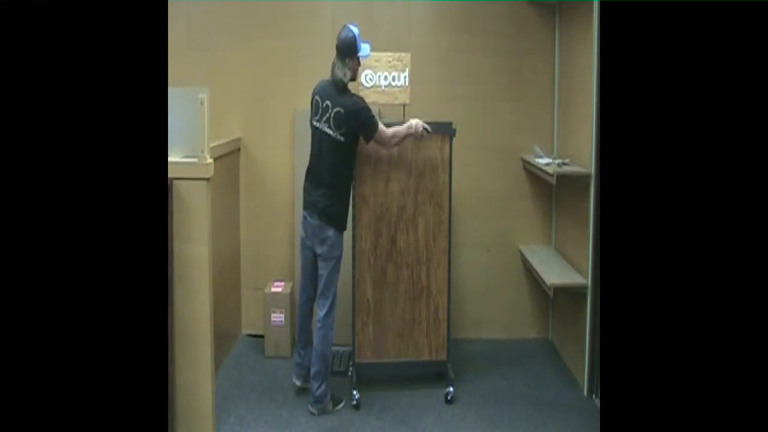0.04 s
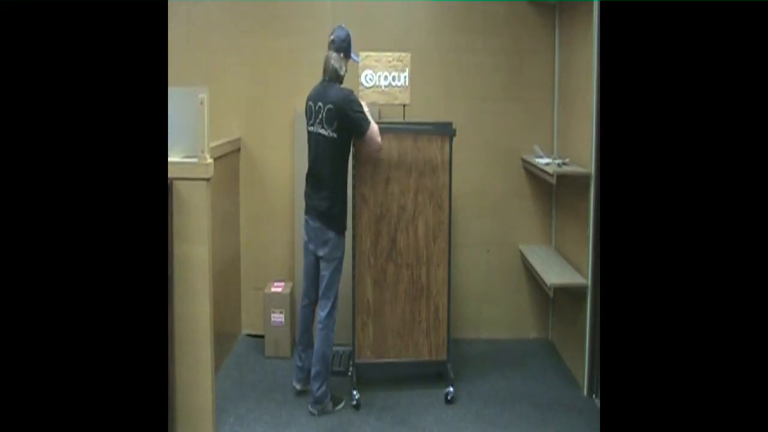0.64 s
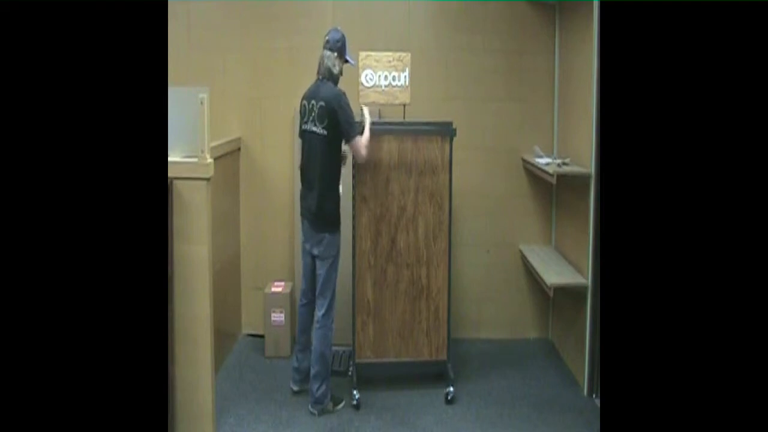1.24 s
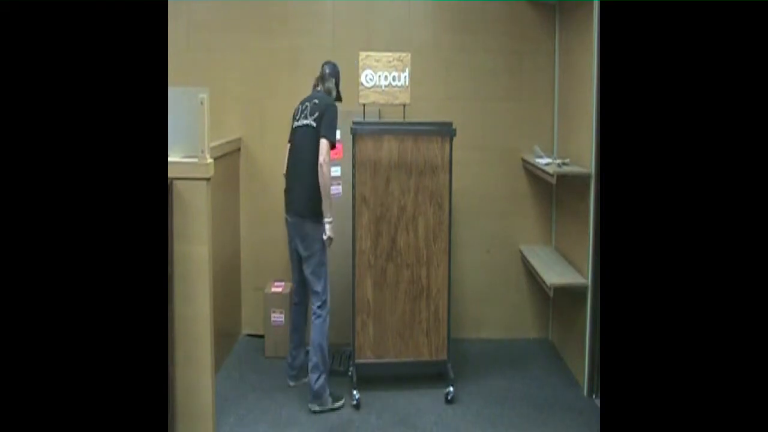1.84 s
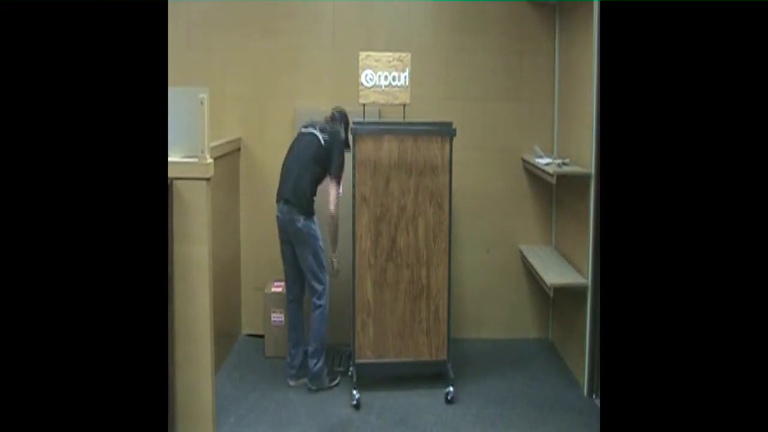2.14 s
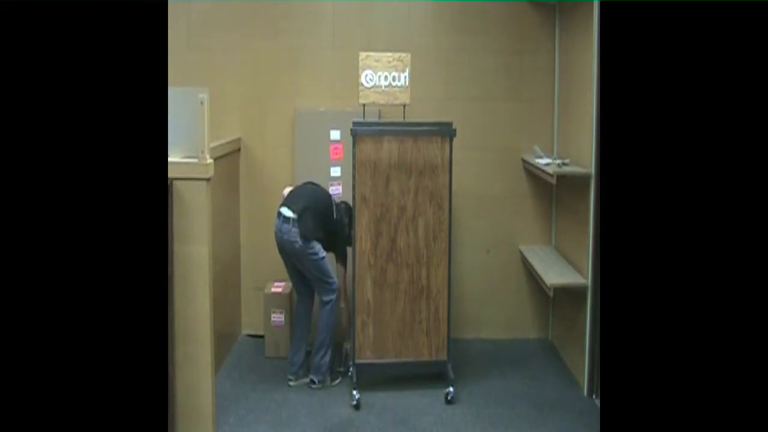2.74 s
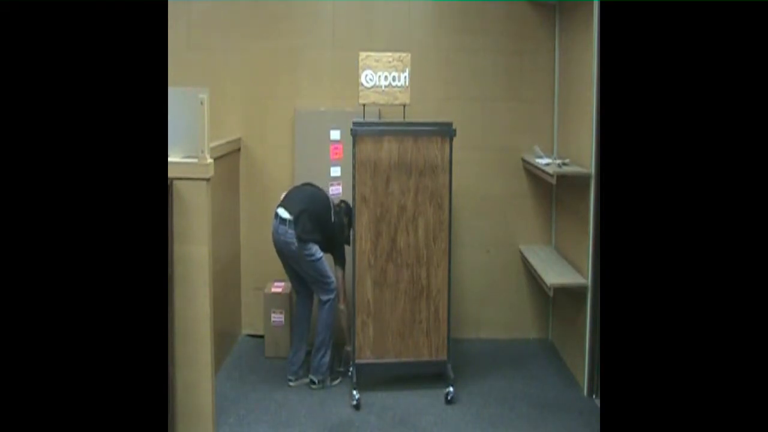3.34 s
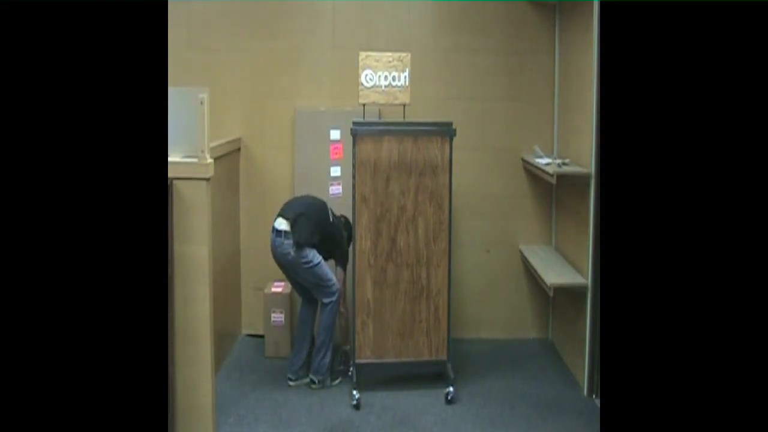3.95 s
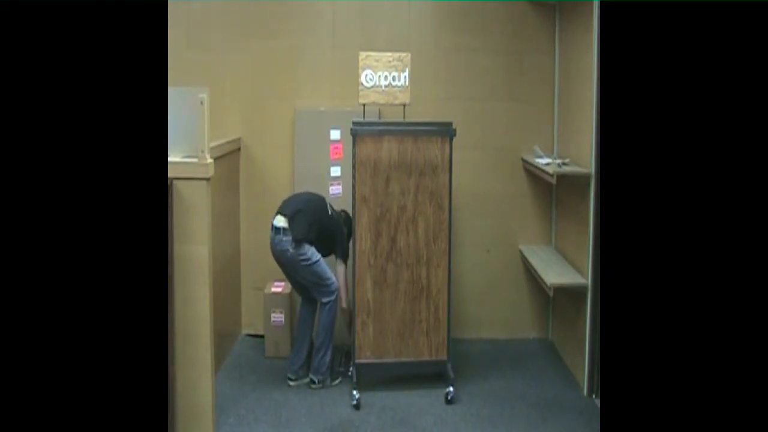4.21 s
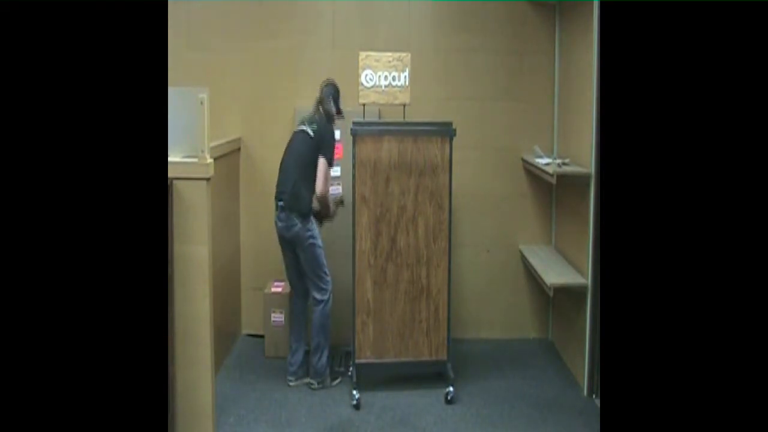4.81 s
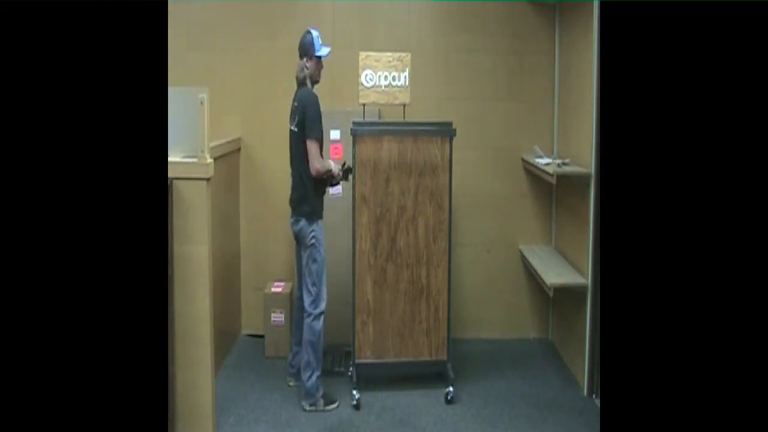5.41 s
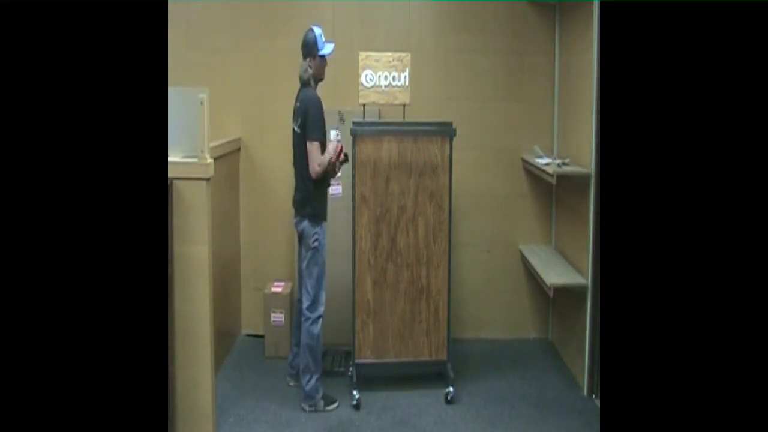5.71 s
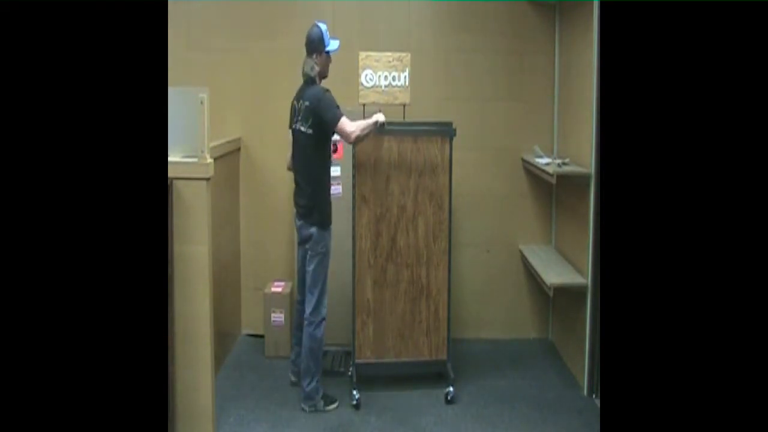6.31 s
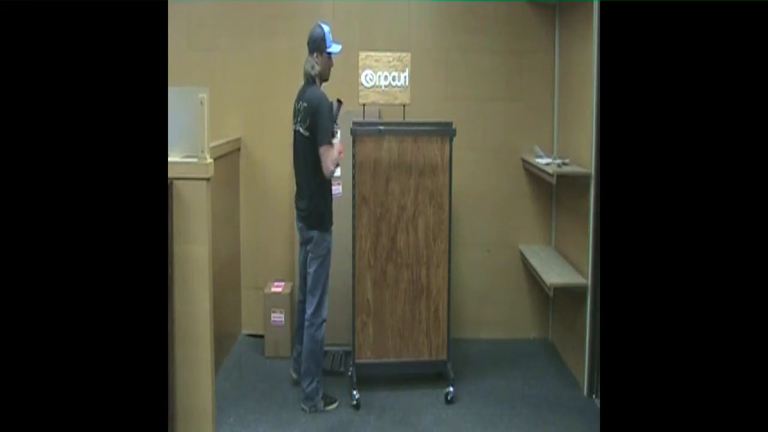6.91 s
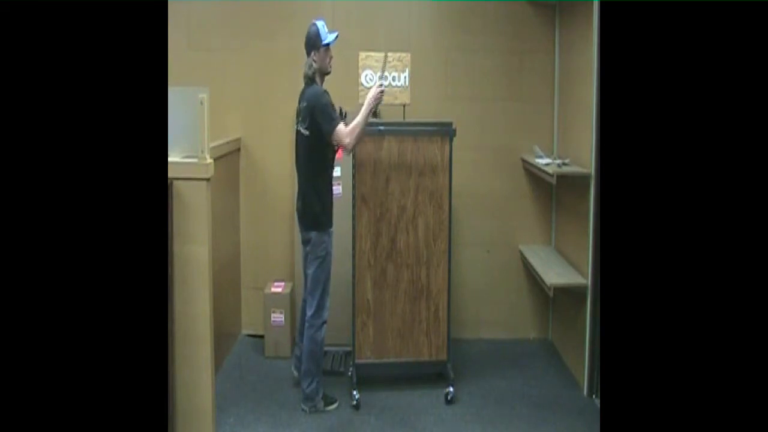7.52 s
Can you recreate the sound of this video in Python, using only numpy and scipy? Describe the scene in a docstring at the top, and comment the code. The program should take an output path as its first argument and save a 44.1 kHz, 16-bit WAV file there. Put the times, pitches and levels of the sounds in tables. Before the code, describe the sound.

Steel bars knock against a wooden rack and clank together with short ringing, in irregular bursts over steady ventilation in a small room.

```python
"""A small, hard-walled room, where steel bars are hooked onto a wooden display rack.
The panel booms as bars seat in it and groans as one slips along it; more bars are picked off
the floor and clank together in the hand. Ventilation, a faint mechanism and a few dry ticks
sit underneath. A camera's gain control and overload flatten the loudest blows,
and the sound cuts out once, briefly."""
import sys
import numpy as np
from scipy import signal
from scipy.fft import rfft, irfft, next_fast_len
from scipy.io import wavfile
from scipy.ndimage import uniform_filter1d

SR = 44100
rng = np.random.default_rng(int(sys.argv[2]) if len(sys.argv) > 2 else 0)


def inscribe(sig):
    """Save sig as 16-bit PCM at rate SR to the path in sys.argv[1].

    A 1-D sig is mono; a 2-D sig holds one channel per row.
    Samples are clipped to [-1, 1] before scaling.
    """
    pcm = np.round(np.clip(np.atleast_2d(sig).T, -1, 1) * 32767)
    wavfile.write(sys.argv[1], SR, pcm.astype(np.int16))


N = 337806
RING_SAMPLES, BAND_LIMIT_HZ = 32768, 15300


def amp(db):
    """Decibels to gain."""
    return np.exp(np.asarray(db) * (np.log(10) / 20))


def curve_at(points, hz):
    """Breakpoints joined by straight lines on a log-frequency axis."""
    freq_hz, value = np.transpose(points)
    return np.interp(np.log(hz + 1), np.log(freq_hz + 1), value)


def unit_rms(x):
    """Scales to rms 1."""
    return x / np.sqrt(np.mean(x ** 2) + 1e-20)


def add(mix, start_s, sound):
    """Lays a sound into the mix."""
    part = mix[:, round(start_s * SR):][:, :sound.shape[-1]]
    part += sound[..., :part.shape[1]]


def colour(x, db_at):
    """Minimum-phase EQ shaped by db_at(hz), scaled to keep the power of white noise."""
    size = next_fast_len(x.shape[-1] + 4096)
    gain = unit_rms(amp(db_at(abs(np.fft.fftfreq(size, 1 / SR)))))
    response = np.exp(np.conj(signal.hilbert(np.log(gain + 1e-5))))
    return irfft(rfft(x, size) * response[:size // 2 + 1], size)[..., :x.shape[-1]]


# Stereo width, side against mid: freq_hz, side_db
STEREO_WIDTH = [(300, -23), (800, -19), (2200, -8), (4400, -11), (8000, -7)]
def stereo_noise(size, db_at, wide_db=0):
    """Noise shaped by db_at(hz, s), nearly alike in two closely spaced microphones."""
    hz, t = np.fft.rfftfreq(256, 1 / SR), np.arange(size // 128 + 2) * 128 / SR
    spectra = rng.standard_normal((2, len(t), len(hz), 2)).view(complex)[..., 0]
    spectra *= amp(db_at(hz, t[:, None]))
    spectra[1] *= amp(curve_at(STEREO_WIDTH, hz) + wide_db)
    mid, side = signal.istft(spectra.transpose(0, 2, 1))[1][:, :size] / np.sqrt(128)
    return np.array([mid + side, mid - side])


# The air bed's rumble and hiss: freq_hz, gain_db
AIR_EQ = [(15, -38), (25, -1), (163, -4.5), (354, -7), (438, -4), (475, -6.5), (655, -6.5), (856, -6),
          (1960, -17), (2560, -24.5), (4040, -25), (15000, -38)]
# Hum tones in the bed: pitch_hz, level_db
HUM_TONES = [(161.5, -60.5), (479, -64.5), (1906, -65.5)]
def ventilation(rush_db=-47, waver=.35):
    """A steady rush of air with a faint, wavering hum."""
    t = np.arange(N) / SR
    noise = stereo_noise(N, lambda hz, s: 0, wide_db=12)
    rush = unit_rms(colour(noise, lambda hz: curve_at(AIR_EQ, hz)))
    knots_s = np.linspace(0, t[-1], 40)
    hum = 0
    for hz, level_db in HUM_TONES:
        drift = np.interp(t, knots_s, rng.standard_normal(len(knots_s)))
        hum += amp(level_db) * np.sqrt(2) * (1 + waver * drift) * np.sin(2 * np.pi * hz * t + drift)
    return amp(rush_db) * rush + hum


def mechanism(first_s=.0205, cycle_s=.15, gap_s=1 / 30, pitch_hz=4050, decay_s=.004, level_db=-51):
    """A small mechanism near the microphone ticks faintly, in quick groups of four."""
    t = np.arange(N) / SR
    tick, age_s = np.divmod((t - first_s) % cycle_s, gap_s)
    return amp(level_db) * (tick < 4) * np.exp(-age_s / decay_s) * np.sin(2 * np.pi * pitch_hz * age_s)


# The room's tail: freq_hz, t60_s
ROOM_DECAY = [(100, 0.67), (200, 0.41), (400, 0.45), (1000, 0.32), (3000, 0.54), (7000, 0.47),
              (13000, 0.28)]
def impact(rattle_s, direct_db, direct_s, bounce=0.99, rebounds=5):
    """A contact and its quick rebounds; each gives a noise burst and then the room's tail."""
    t = np.arange(RING_SAMPLES) / SR
    tail = stereo_noise(RING_SAMPLES, lambda hz, s: -60 * s / curve_at(ROOM_DECAY, hz))
    hit = tail * (1 + amp(direct_db) * np.exp(-t / direct_s))
    delays_s = rattle_s * (np.arange(rebounds) + rng.uniform(.2, 1, rebounds)) / rebounds
    gains = bounce * rng.uniform(.6, 1.4, rebounds) * rng.choice([-1, 1], rebounds)
    out = hit.copy()
    for delay_s, gain in zip(delays_s, gains):
        add(out, delay_s, gain * hit)
    return out / np.sqrt(1 + np.sum(gains ** 2))


def ring(modes, tone_db, t60_at_2khz_s, rise_s, damping, linger, split_hz=6, twin_db=-13):
    """Modes build during contact and die sooner the higher they are; each beats with a weak twin."""
    t = np.arange(RING_SAMPLES) / SR
    total = np.linalg.norm([amp(mode[1]) for mode in modes])
    out = np.zeros((2, RING_SAMPLES))
    for hz, level_db, *sustain_s in modes:
        phase, detune, side = rng.uniform(-1, 1, 3)
        t60_s = t60_at_2khz_s * (2000 / hz) ** damping
        twin_t60_s = sustain_s[0] if sustain_s else t60_s * linger
        twin_hz = hz + split_hz * detune
        wave = amp(-60 * t / t60_s) * np.sin(2 * np.pi * (hz * t + phase))
        wave += amp(twin_db - 60 * t / twin_t60_s) * np.cos(2 * np.pi * (twin_hz * t + phase))
        lean = np.sign(side) * amp(curve_at(STEREO_WIDTH, hz))  # standing waves favour one microphone
        out += np.outer([1 + lean, 1 - lean], amp(level_db + tone_db(hz)) * wave)
    fade_out = np.minimum(10 * (t[-1] - t), 1)
    return out / total * (1 - np.exp(-t / rise_s)) * fade_out


# The panel's boom: pitch_hz, level_db
PANEL_MODES = [(168, -5.5), (253, 2.5), (325, 4.5), (408, 13), (441, 8), (600, -4.5), (742, -2.5),
               (832, -3)]
# Woody body, a crowd of short-lived modes: freq_hz, gain_db
WOOD_EQ = [(29, -82.5), (50, -26), (216, -14.5), (255, -9), (315, -6.5), (427, -2), (600, -5), (827, -5),
           (1390, -12), (2030, -10), (2950, -24.5), (3320, -15.5), (8530, -26), (14000, -38)]
# The top cracks, the foot thuds, the rebound is dull: bass_db, bass_cut_db_per_db, clack_db, crack_db
KNOCK_VOICING = {"top": (-1.5, -0.15, 1.5, -3), "foot": (5, 0.8445, 0, -28),
                 "rebound": (4.5, -0.6, -4, -18.5)}
# Hits on the rack: start_s, kind, level_db, rattle_s
KNOCK_CUES = [(.497, "top", 5, 0.014), (0.529, "rebound", 0.5, 0.021), (1.008, "top", 4, .017),
              (1.071, "rebound", 1.5, 0.032), (2.217, "foot", 3, 0.0094), (3.116, "foot", -30.5, 0.038),
              (4.141, "foot", -7, 0.018), (6.272, "top", -6.5, .014), (6.312, "rebound", -8.5, 0.013),
              (6.424, "rebound", -18, 0.065), (6.536, "top", -10.5, .03), (6.555, "rebound", -16.5, 0.029)]
def rack_knocks(trim_db=-9.5, boom_db=-3, clack_db_per_db=0.41):
    """The wooden panel booms under each blow; a stronger blow has more clack."""
    out = np.zeros((2, N))
    for start_s, kind, level_db, rattle_s in KNOCK_CUES:
        bass_db, bass_cut, clack_db, crack_db = KNOCK_VOICING[kind]
        tilt = [(70, 0), (170, bass_db - bass_cut * level_db), (400, 0.01),
                (1100, clack_db + clack_db_per_db * level_db), (3500, crack_db)]
        tone_db = lambda hz: curve_at(tilt, hz)
        hit = impact(rattle_s, direct_db=-8.5, direct_s=0.22)
        body = colour(hit, lambda hz: curve_at(WOOD_EQ, hz) + tone_db(hz))
        boom = ring(PANEL_MODES, tone_db, t60_at_2khz_s=.13, rise_s=rattle_s, damping=0.6, linger=0.92)
        add(out, start_s, amp(level_db + trim_db) * (body + amp(boom_db) * boom))
    return out


# The ticks' colour: freq_hz, gain_db
TICK_EQ = [(300, -9), (900, 3.5), (1900, 6.5), (2550, 0), (2800, 11), (3100, -2), (6400, -5.5), (7000, 4.5),
           (7700, -0.5), (13000, -21)]
# Close ticks, alone or in short runs: start_s, level_db, count
TICK_CUES = [(0.7147, -26, 1), (0.733, -27, 1), (0.8845, -35, 3), (1.2267, -21, 1), (1.284, -23, 1),
             (1.301, -35.5, 2), (1.46, -38.5, 2)]
def dry_ticks(trim_db=6.5, click_db=12, fizz_s=0.0032, gap_s=.054):
    """Tiny snaps, each a click with a trace of fizz, too close and weak to stir the room."""
    out, t = np.zeros((2, N)), np.arange(2048) / SR
    for start_s, level_db, count in TICK_CUES:
        for k in range(round(count)):
            snap = stereo_noise(len(t), lambda hz, s: 0) * np.exp(-t / fizz_s) / 2
            snap[:, 0] += amp(click_db)
            tick = colour(snap, lambda hz: curve_at(TICK_EQ, hz))
            add(out, start_s + k * gap_s, amp(level_db + trim_db) * tick)
    return out


# Each bar's strong notes: pitch_hz, level_db, twin_t60_s (only where the twin sings on)
BAR_MODES = {"loose": [(1571, 9.4, 0.96), (2245, 4.5), (2437, 2), (3302, 4.5), (3300, 10.5), (4560, 8.2),
             (5990, 0), (6100, 7.7)], "dropped": [(1674, -2), (3616, 4.5), (4748, 2), (4958, 2), (5389, 1),
             (6293, 0.5), (7101, 5)], "lifted": [(910, 0, 1.36), (993, -6, 1.37), (2500, -0.96),
             (1600, -1.4, 1), (2225, 0.84, 0.99), (2388, 2), (3620, -2.5), (3500, -1), (6600, 7.8)],
             "long": [(864, -1.5, 1), (1175, -5), (1900, 0), (1863, 5), (1600, -1), (2800, -6.5),
             (3100, 2.5), (3420, -1), (3930, 2.6), (4060, 1.6), (7000, -4.5), (5900, 0), (7676, -6),
             (8398, 1.5)], "short": [(861, -4.5), (1900, 3, .7), (1900, 3.3), (2200, 8.7), (4000, -1),
             (3741, 4.6), (4272, 2.8, 0.47), (5165, 2.3), (7405, -2), (10000, 2)], "rail": [(1286, -4.5),
             (1622, 3.5), (3470, 1.5), (4515, 4), (4730, 1.5), (4844, -4)], "hook": [(318, -15, 12),
             (1173, 0), (1800, 3.7), (1800, 4.6), (2347, 6.2, 0.76), (3460, 10.6), (3840, 14), (4035, 11),
             (8100, 10), (9300, 12)]}
# Each bar's ring time, damped by a gripping hand: t60_at_2khz_s
BAR_DECAY = {"loose": 0.31, "dropped": 0.3, "lifted": 0.43, "long": 0.17, "short": 0.24, "rail": 0.24,
             "hook": 0.24}
# Steely clatter, a crowd of short-lived modes: freq_hz, gain_db
STEEL_EQ = [(250, -38.5), (600, -9.5), (860, -8.5), (1600, -4), (2200, -6.5), (2800, -10), (3900, -3.5),
            (5600, -12), (8500, -13), (11000, -21.5), (15000, -47.5)]
# Each bar's character: body_db, edge_db, ring_db
BAR_VOICING = {"loose": (0.011, -1.7, 4.3), "dropped": (-0.98, 0.38, -1.01), "lifted": (0.79, 0.98, 0.28),
               "long": (0.61, -1.5, 3.7), "short": (-2.4, .5, 0.94), "rail": (0.61, -1.94, 7.3),
               "hook": (1, 0.023, 0.95)}
# A strike rings freely, a slide is duller, a jam is choked, a nudge is soft: body_db, edge_db, ring_db
CONTACT_VOICING = {"strike": (0, -1.5, -2.36), "slide": (-1.06, -8.5, -2.7), "jam": (0, 5.5, -13.5),
                   "nudge": (10.3, -6, -16.5)}
CLANK_CUES = [(1.012, "rail", "jam", -7.5, 0.0059, None), (1.129, "rail", "jam", -19, 0.079, None),
              (2.224, "rail", "jam", -19.5, .0067, None), (2.632, "loose", "strike", -30.5, 0.01, None),
              (3.147, "loose", "nudge", -34.5, 0.004, 1571), (3.32, "loose", "nudge", -39, 0.0043, None),
              (3.341, "loose", "strike", -33, 0.024, None),
              (3.623, "dropped", "strike", -19.5, 0.0096, None),
              (3.941, "lifted", "nudge", -37, 0.015, None), (4.007, "lifted", "nudge", -31.5, 0.053, None),
              (4.123, "lifted", "slide", -15, 0.016, None),
              (4.139, "lifted", "strike", -16.5, 0.0067, 3664), (4.788, "long", "strike", -10, 0.036, 3880),
              (5.025, "short", "strike", -10, 0.0076, 5165), (5.06, "short", "slide", -7.5, 0.025, 4300),
              (5.197, "long", "slide", -22.5, 0.022, 864), (5.383, "short", "slide", -31.5, .012, None),
              (5.435, "long", "slide", -19.5, 0.033, None), (5.453, "long", "strike", -10, 0.03, None),
              (5.488, "long", "strike", -8, .019, 3930), (5.535, "long", "slide", -10, 0.042, 1570),
              (5.655, "hook", "slide", -16, 0.024, 3460), (5.806, "long", "strike", -37.5, 0.029, 850),
              (5.954, "long", "slide", -45.5, .03, 1850), (6.038, "long", "slide", -40, .03, None),
              (6.08, "lifted", "strike", -37.5, 0.027, 2225), (6.262, "rail", "strike", -15, 0.0072, None),
              (6.532, "rail", "jam", -12.5, 0.0072, None), (6.899, "hook", "nudge", -31, 0.022, 900),
              (6.998, "hook", "nudge", -27, 0.044, 1173), (7.107, "hook", "strike", -10, 0.0047, None),
              (7.135, "hook", "strike", -9.5, 0.031, 1165)]
def bar_clanks(trim_db=-7.5, notes_db=11, ripple_db=3, accent_db=8, accent_width_hz=55):
    """Steel bars clash, clatter and ring; the point of contact may bring out one note."""
    out = np.zeros((2, N))
    grid_hz = np.linspace(0, BAND_LIMIT_HZ, 260)
    depth_db = ripple_db * np.minimum(grid_hz / 4000, 1)
    weak_modes_db = {bar: depth_db * rng.standard_normal(len(grid_hz)) for bar in BAR_MODES}
    for start_s, bar, contact, level_db, rattle_s, accent_hz in CLANK_CUES:
        body_db, edge_db, ring_db = np.add(BAR_VOICING[bar], CONTACT_VOICING[contact])
        force_db = level_db + 24  # above a middling clank, body gives way to edge
        tilt = [(1400, body_db - 0.16 * force_db), (4400, 0.0049), (8000, edge_db + 0.15 * force_db)]

        def tone_db(hz):
            accent = np.exp(-((hz - accent_hz) / accent_width_hz) ** 2) if accent_hz else 0
            return curve_at(tilt, hz) + accent_db * accent

        def clatter_db(hz):
            return curve_at(STEEL_EQ, hz) + tone_db(hz) + np.interp(hz, grid_hz, weak_modes_db[bar])

        clatter = colour(impact(rattle_s, direct_db=1.0, direct_s=0.016), clatter_db)
        notes = ring(BAR_MODES[bar], tone_db, BAR_DECAY[bar], rattle_s / 2, damping=0.5, linger=2.1)
        add(out, start_s, amp(level_db + trim_db) * (clatter + amp(ring_db + notes_db) * notes))
    return out


# A bar slips along the panel: start_s, level_db
SLIP_CUES = [(6.335, -27), (6.458, -26.5), (6.58, -29.5)]
def panel_groans(swell_s=0.036):
    """Each slip of a pushed bar sets the panel's lowest mode swelling and dying away."""
    out, t = np.zeros((2, N)), np.arange(RING_SAMPLES) / SR
    pitch_hz = PANEL_MODES[0][0]
    swell = t / swell_s * np.exp(1 - t / swell_s)
    for start_s, level_db in SLIP_CUES:
        add(out, start_s, amp(level_db) * swell * np.sin(2 * np.pi * (pitch_hz * t + rng.random())))
    return out


def scene():
    """Everything in the room, a touch to the left."""
    mix = ventilation() + mechanism() + rack_knocks() + dry_ticks() + bar_clanks() + panel_groans()
    return mix * amp([[.15], [-.15]])


def gain_control(x, threshold_db=-14, fall_db_per_s=42, share=0.79, attack_s=0.012):
    """Ducks within milliseconds on a loud blow and creeps back up."""
    power = signal.lfilter(np.ones(128) / 128, 1, (x ** 2).mean(0))
    fall_db = np.arange(N) / SR * fall_db_per_s
    held_db = np.maximum.accumulate(10 * np.log10(power + 1e-12) + fall_db) - fall_db
    pole = np.exp(-1 / (attack_s * SR))
    over_db = signal.lfilter([1 - pole], [1, -pole], np.maximum(held_db - threshold_db, 0))
    return x * amp(-share * over_db)


# The sound cuts out: start_s, end_s
DROPOUT = (5.27, 5.395)
def record(dry):
    """The camera's chain: gain control, soft overload, one short cut to silence, band limit."""
    t = np.arange(N) / SR
    start_s, end_s = DROPOUT
    mute = uniform_filter1d(((t > start_s) & (t < end_s)) * 1., size=64)
    flattened = np.tanh(gain_control(dry))
    lowpass = signal.firwin(511, BAND_LIMIT_HZ, window=("kaiser", 9), fs=SR)
    return signal.oaconvolve(flattened * (1 - mute), lowpass[None], "same")


dry = scene()
out = record(dry)
inscribe(out)
```